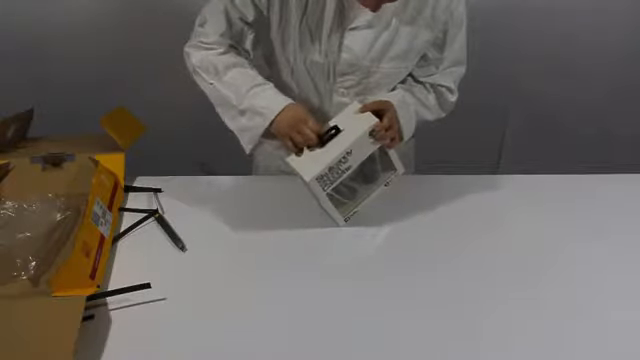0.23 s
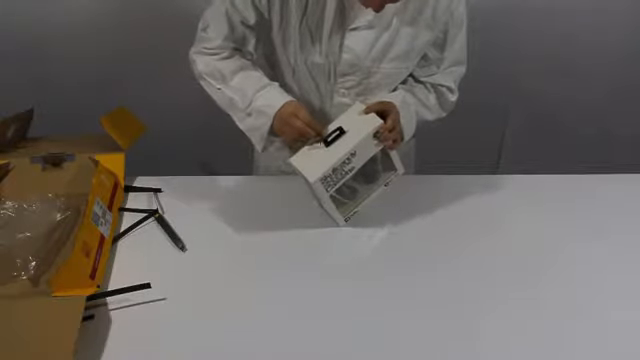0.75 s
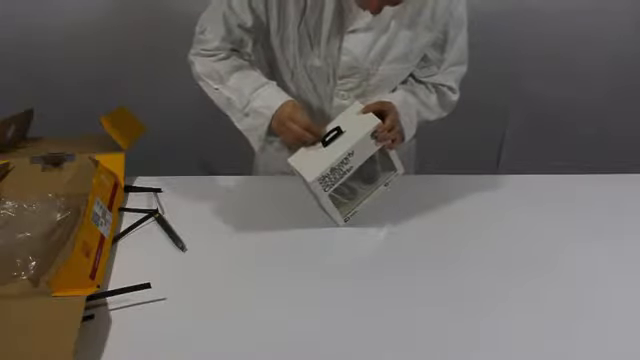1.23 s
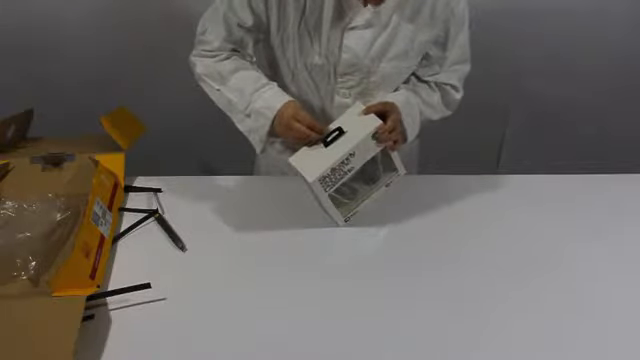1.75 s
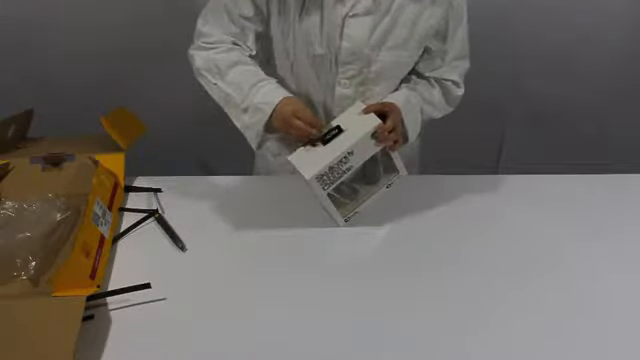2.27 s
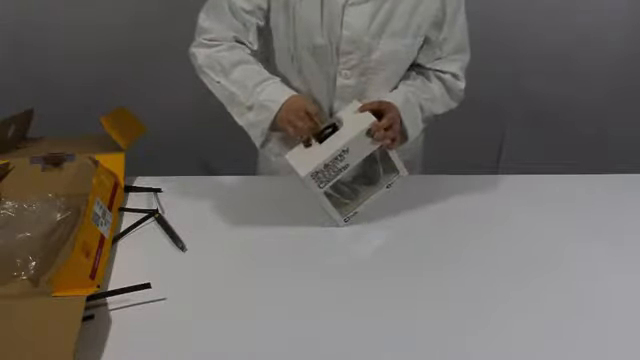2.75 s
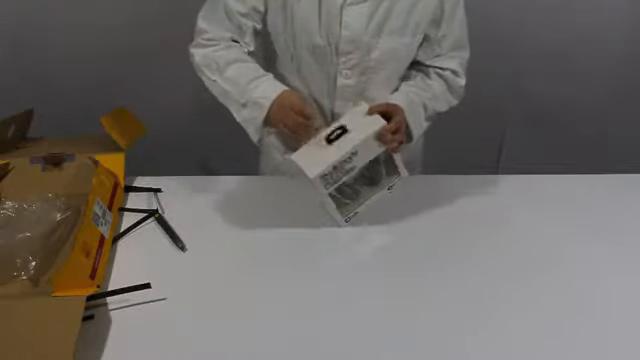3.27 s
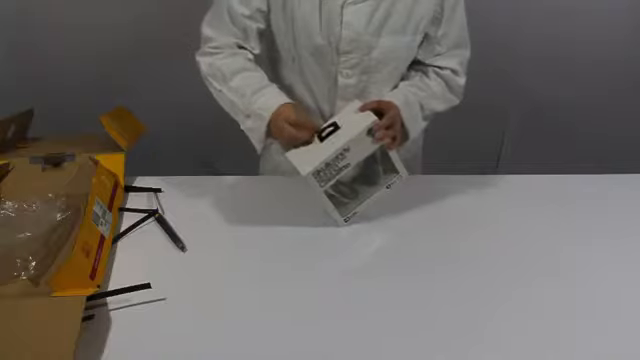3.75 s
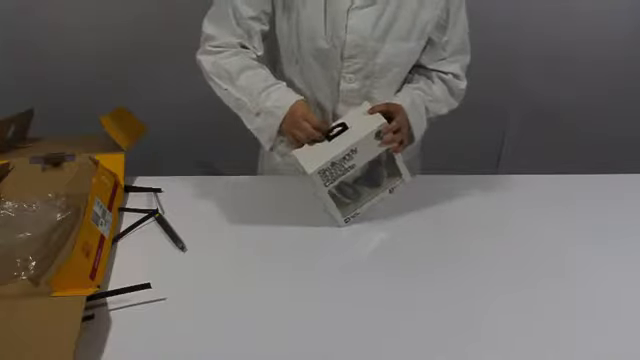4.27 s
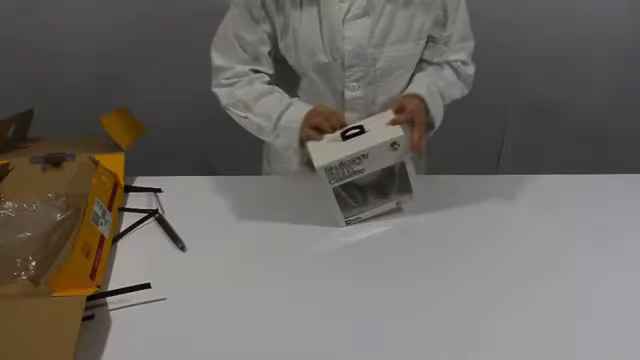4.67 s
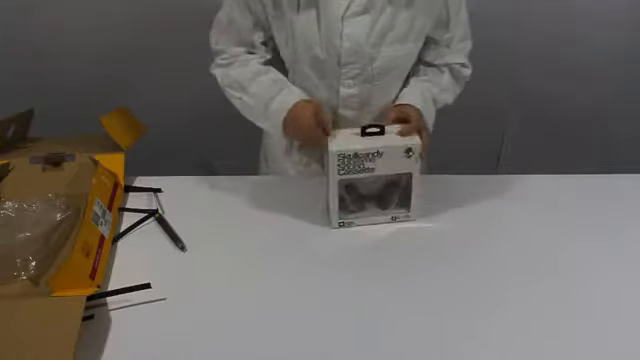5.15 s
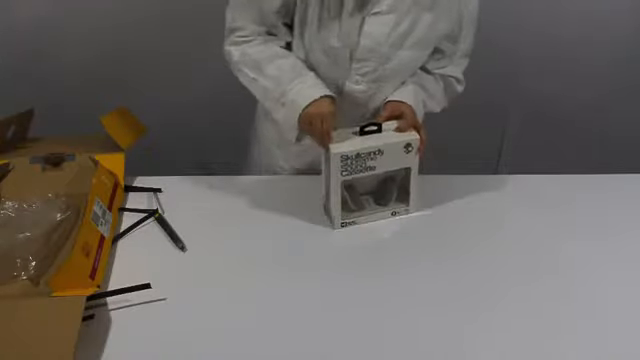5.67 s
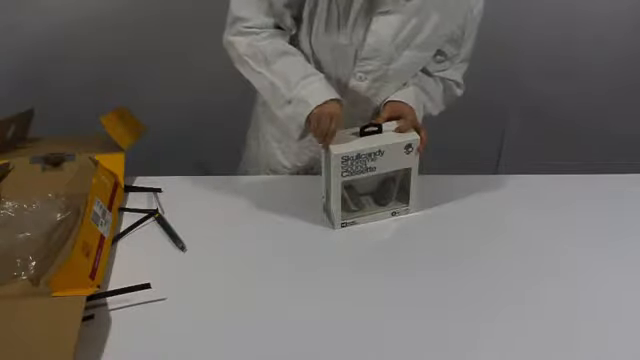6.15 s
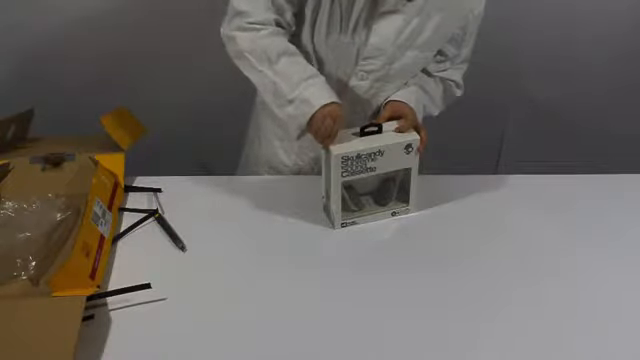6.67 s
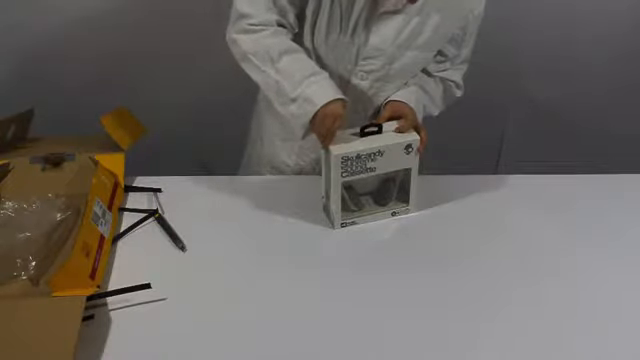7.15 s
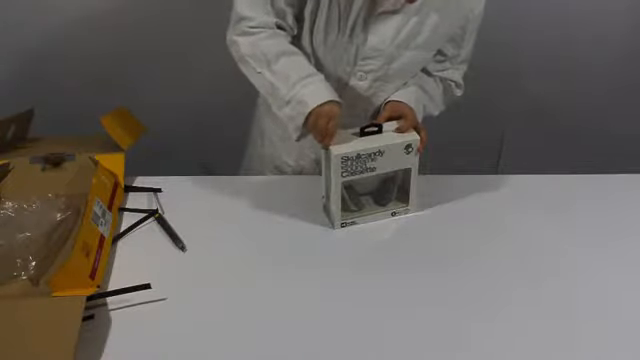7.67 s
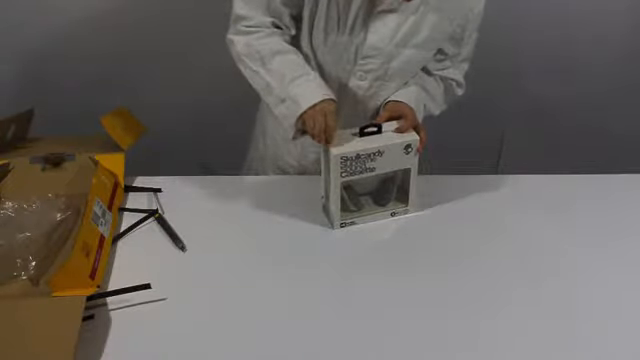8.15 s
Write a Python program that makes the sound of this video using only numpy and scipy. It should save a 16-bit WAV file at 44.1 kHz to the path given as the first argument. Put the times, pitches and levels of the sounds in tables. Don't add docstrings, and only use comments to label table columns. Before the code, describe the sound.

Fingernails pick at stiff plastic seals on a hollow cardboard box, sharp cracks and dull thumps spaced irregularly in a bare, echoing room.

```python
import sys
import numpy as np
from scipy import signal
from scipy.io import wavfile

SR = 44100
rng = np.random.default_rng(int(sys.argv[2]) if len(sys.argv) > 2 else 0)


def boost_factor(decibels):
    exponent = np.asarray(decibels, float) / 20
    return 10 ** exponent


def digitize_waveform(pressure):
    field = np.atleast_2d(pressure).T
    bounded = np.clip(field, -1, 1)
    quanta = np.round(bounded * 32767).astype(np.int16)
    wavfile.write(sys.argv[1], SR, quanta)


N = 371322


def rms_one(x):
    return x / np.sqrt(np.mean(x ** 2) + 1e-20)


def band(x, low_hz, high_hz):
    sos = signal.butter(2, [low_hz, min(high_hz, 0.45 * SR)], "band", fs=SR, output="sos")
    return signal.sosfilt(sos, x + 1e-18)


def high_pass(x, order, hz):
    return signal.sosfilt(signal.butter(order, hz, "high", fs=SR, output="sos"), x)


def at_hz(points, hz, column=1):
    points = np.array(points)
    return np.interp(np.log(hz), np.log(points[:, 0]), points[:, column])


def drift(knots_per_s):
    knots = rng.standard_normal(400)
    return np.interp(np.arange(N) / SR * knots_per_s, np.arange(400), knots)


def strikes(times_s, shapes):
    out = np.zeros(N + SR)
    for s, shape in zip(times_s, shapes):
        at = max(round(s * SR), 0)
        out[at:at + len(shape)] += shape
    return out[:N]


def rings(db, hz, t60_s, swell_s):
    t = np.arange(SR // 5) / SR
    decay_db = 60 * t / np.clip(t60_s, 0.005, 0.4)[:, None]
    envelope = boost_factor(db[:, None] - decay_db) * (1 - np.exp(-t / swell_s))
    return envelope * np.sin(2 * np.pi * hz[:, None] * t)


# frequency in Hz, level in dB per Hz.
AIR = [(15, -47), (25, -22), (87, 0.5), (149, -1.5), (212, -2.5), (476, -1), (659, -6.5), (775, -5.5),
       (988, -4), (1260, -2), (2000, -9.5), (3820, -12), (11900, -19), (16000, -20)]
AIR_DB = -56.5


def air(patchy_db=1.6):
    white = rng.standard_normal((2, N))
    edges_hz = 22 * 2 ** np.arange(0, 9.8, 1 / 3)
    out = np.zeros(N)
    for k, (low, high) in enumerate(zip(edges_hz, edges_hz[1:])):
        level_db = at_hz(AIR, np.sqrt(low * high)) + patchy_db * drift(3.7)
        out += boost_factor(level_db) * band(white[k % 2], low, high)
    return boost_factor(AIR_DB) * rms_one(out)


# time in seconds, pitch in Hz, level in dB.
MOTOR = [(0, 152, -71.5), (2.7, 152, -74), (3.0, 155, -68), (4.0, 148, -69), (4.2, 144, -58.5),
         (4.6, 142, -62), (4.75, 145, -73), (6.3, 149, -64), (6.6, 150, -62), (6.8, 158, -69.5),
         (7.1, 163, -63.5), (7.4, 163, -65.5), (7.7, 165, -56.5), (7.85, 162, -75), (8.15, 160, -73),
         (8.3, 157, -61), (8.42, 156, -61)]


def motor():
    s, hz_knots, db_knots = np.transpose(MOTOR)
    t = np.arange(N) / SR
    hz = np.interp(t, s, hz_knots)
    level_db = np.interp(t, s, db_knots) + 1.3 * drift(7)
    return np.sqrt(2) * boost_factor(level_db) * np.sin(2 * np.pi * np.cumsum(hz) / SR)


# delay in seconds, level in dB.
ECHOES = [(.0009, -3.5), (.0021, -9.5), (.0034, -17), (.0054, -17), (.0068, -11), (.0126, -14),
          (.0195, -24), (.023, -26)]
# frequency in Hz, t60 in seconds, level in dB.
ROOM = [(100, 0.8, -11.5), (300, 0.95, -9.5), (680, 0.78, -6), (1150, 1.08, -6.5), (2560, 1.14, -5.5),
        (4760, 1.06, -7.5), (7000, 0.76, -10.5), (10000, 0.65, -12), (14000, 0.42, -14)]


def room(x, echo_db, build_s=0.0028):
    t = np.arange(int(1.3 * SR)) / SR
    white = rng.standard_normal((2, len(t)))
    edges_hz = 60 * 2 ** np.arange(0, 8.6, 0.5)
    response = np.zeros(len(t))
    for k, (low, high) in enumerate(zip(edges_hz, edges_hz[1:])):
        hz = np.sqrt(low * high)
        level_db = at_hz(ROOM, hz, column=2) - 27.5 - 60 * t / at_hz(ROOM, hz)
        response += band(white[k % 2], low, high) * boost_factor(level_db)
    response *= 1 - np.exp(-(t / build_s) ** 2)
    response[0] = 1
    for s, level_db in ECHOES:
        response[round(s * SR)] += boost_factor(level_db + echo_db)
    return signal.fftconvolve(x, response)[:N]


# start in seconds, length in seconds, level in dB, lowest Hz, highest Hz.
RUBS = [(.01, 0.42, -62, 1200, 15000), (0.055, 0.37, -57, 200, 550), (2.19, 0.44, -60, 1500, 7000),
        (2.55, 0.09, -54, 1800, 7500), (2.712, 0.055, -58, 1800, 7000), (3.087, 0.088, -58, 4900, 15600),
        (3.665, 0.055, -49, 1000, 10000), (3.8, 0.66, -63, 990, 4430), (4.22, 0.24, -53, 5960, 15500),
        (4.733, 0.12, -55, 2500, 15500), (4.82, 0.27, -46.5, 900, 13000), (4.82, 0.27, -47.5, 248, 880),
        (4.909, 0.053, -50.5, 1000, 15500), (5.09, 0.73, -58.5, 900, 7000), (5.42, 0.42, -53.5, 150, 421),
        (5.525, 0.09, -57, 1500, 15000), (6.355, 0.04, -47.5, 1300, 10000), (6.9, 0.081, -65, 1500, 8000),
        (7.459, 0.04, -54, 3060, 9000), (7.855, 0.15, -68, 1500, 5980), (8.28, .08, -68, 2000, 15500)]
GRAINS_PER_CYCLE, MOST_GRAINS_PER_S = 3.3, 3000


def handling(uneven_db=4.1):
    sizes = boost_factor(uneven_db * np.minimum(rng.exponential(1, N), 5)) * rng.choice([-1, 1], N)
    chance = rng.random(N)
    out = np.zeros(N)
    for s, length_s, db, low_hz, high_hz in RUBS:
        span = slice(max(round(s * SR), 0), min(round((s + max(length_s, 0.02)) * SR), N))
        grains_per_s = np.clip(GRAINS_PER_CYCLE * low_hz, 200, MOST_GRAINS_PER_S)
        caught = chance[span] < grains_per_s / SR
        grains = band(sizes[span] * caught, low_hz, high_hz)
        stroke = np.sin(np.linspace(0, np.pi, len(grains)))
        out[span] += boost_factor(db) * rms_one(grains) * stroke
    return out


# time in seconds, peak in dB, pitch in Hz, t60 in seconds.
TABLE = [(1.017, -34, 114, 0.091), (2.042, -37, 107, 0.13), (3.199, -45, 100, .15), (4.86, -44, 110, .15),
         (4.95, -39, 100, 0.17), (5.02, -47, 65, 0.18), (5.56, -44, 149, 0.14), (6.066, -41, 111, .15),
         (6.631, -39.5, 123, 0.27), (7.221, -47, 111, .15)]


def table_booms():
    s, db, hz, t60_s = np.transpose(TABLE)
    return strikes(s, rings(db, hz, t60_s, swell_s=0.017))


DELAY_S = 0.001001
# time in seconds, peak in dB, struck panel in Hz, share of the
# low modes in dB, share of the upper modes in dB.
THUMPS = [(0.578, -34.1, 476.0, -13.3, -28.7), (1.018, -15.0, 444.0, -10.1, -13.6),
          (1.483, -18.1, 447.0, -7.8, -12.1), (2.039, -16.3, 491.0, -6.8, -4.6),
          (3.196, -18.4, 411.0, -16.3, -26.7), (4.391, -14.2, 490.0, -18.6, -4.4),
          (4.825, -31.7, 473.0, -15.4, -9.4), (4.866, -35.3, 520.0, -11.5, -6.5),
          (5.012, -28.0, 500.0, -20.8, 0.3), (5.4, -38.1, 425.0, -8.8, -13.2),
          (5.535, -36.6, 504.0, 0.3, -15.7), (5.618, -50.1, 450.0, 11.9, -4.0),
          (6.064, -25.5, 477.0, -5.8, -7.6), (6.28, -25.8, 470.0, -32.3, -15.1),
          (6.63, -11.4, 471.0, -16.0, -12.2), (7.22, -14.6, 422.0, -20.6, -17.6),
          (7.557, -30.9, 448.0, -21.0, -8.2)]
# time in seconds, peak in dB, struck
# panel in Hz.
MORE_THUMPS = [(0.223, -55, 435), (0.331, -43.5, 500), (0.618, -48, 490), (0.647, -55, 470), (0.951, -55, 463),
               (3.908, -42.5, 414), (4.279, -46, 460), (4.356, -42, 480), (5.756, -40, 430), (7.488, -41, 422),
               (7.727, -39, 444), (7.921, -42, 437), (7.959, -48, 440), (7.992, -47, 440), (8.326, -55, 401)]
MORE_LOW_DB, MORE_UPPER_DB = -14, -12
# frequency in Hz, level in dB, t60 in seconds.
BOX = [
    [(204, -4, 0.064), (243, 1, 0.062), (316.6, 4.5, 0.053)],
    [(608, 4, 0.045), (704, 3.5, 0.038)],
    [(882, 1.5, 0.026), (998, -2, 0.028)],
]


def box_thumps(panel_t60_s=0.036):
    taps = [(*tap, MORE_LOW_DB, MORE_UPPER_DB) for tap in MORE_THUMPS]
    s, db, hz, low_db, upper_db = np.transpose(THUMPS + taps)
    each = np.ones(len(s))
    box = rings(db - 0.5, hz, panel_t60_s * each, swell_s=0.00041)
    top_db = upper_db - 3.2
    for share_db, group in zip([low_db, upper_db, top_db], BOX):
        detune = 1 + 0.035 * rng.standard_normal((len(s), len(group)))
        for j, (mode_hz, mode_db, t60_s) in enumerate(group):
            level_db = db + share_db + mode_db - 2.0
            mode = rings(level_db, mode_hz * detune[:, j], t60_s * each, swell_s=0.00059)
            box -= (-1) ** j * mode
    return strikes(s + DELAY_S, box)


# time in seconds, peak in dB, brightness in dB per film resonance upward,
# fullness of the two middle resonances in dB.
CRACKS = [(0.2094, -33.1, 2.1, -7.9), (0.254, -38.8, 2.2, -3.4), (0.5752, -30.8, -2.8, 5.1),
          (0.8024, -51.7, -1.0, 15.6), (1.0175, 3.2, 2.7, 4.1), (1.2138, -21.4, 5.6, -0.8),
          (1.4812, 2.2, 3.6, 2.4), (2.0386, -10.3, 2.0, 7.0), (2.1934, -29.0, 0.8, 0.2),
          (3.0929, -34.0, 9.0, -0.1), (3.1912, -6.9, 4.1, -7.6), (3.195, -12.2, 1.4, -2.6),
          (3.3548, -30.3, 5.6, -4.5), (3.6704, -30.1, 0.6, 0.9), (3.6935, -31.5, 0.6, 7.5),
          (3.927, -47.7, 4.2, 13.3), (4.3885, -2.3, 6.6, -2.0), (4.7506, -28.9, 7.3, 0.7),
          (4.863, -23.5, 3.9, 1.0), (4.89, -22.6, 8.9, 4.0), (4.9276, -22.9, 3.7, 2.6),
          (5.01, -20.6, 7.4, 3.2), (6.0606, -25.9, 0.5, 5.2), (6.2771, -24.8, 4.0, 3.2),
          (6.3653, -32.5, -1.9, 9.7), (6.6278, -5.8, 4.3, 3.5), (7.215, -24.9, -1.3, 4.1),
          (7.474, -37.6, -2.8, 5.7), (7.5712, -34.3, 1.6, 8.0), (7.7258, -24.9, 2.5, -0.7)]
# centre in Hz, width in Hz.
FILM = [(1280, 640), (3050, 2400), (5800, 4200), (12700, 5900)]
FILM_SHARE_DB = -15


def cracks(burst_s=0.00035, ragged=0.23):
    s, db, bright_db, full_db = np.transpose(CRACKS)
    decay = np.exp(-np.arange(120) / SR / burst_s)
    force = ragged * rng.standard_normal((len(s), 120)) * decay
    force[:, 0] = -1.68
    out = np.zeros(N)
    for k, (hz, width_hz) in enumerate(FILM):
        low_hz, high_hz = hz - width_hz / 2, hz + width_hz / 2
        impulse_peak = np.abs(band(np.eye(1, 400)[0], low_hz, high_hz)).max()
        share_db = FILM_SHARE_DB + bright_db * (k - 1.5) + full_db * (k in (1, 2))
        hits = strikes(s + DELAY_S, force * boost_factor(db + share_db - 1.4)[:, None])
        out += band(hits, low_hz, high_hz) / impulse_peak * (-1) ** k
    return out


def scene():
    snap = high_pass(cracks(), 2, 140)
    thud = high_pass(box_thumps() + table_booms(), 3, 80)
    mono = room(snap + thud, echo_db=0.01) + room(handling(), echo_db=-9) + motor() + air()
    return np.array([mono, mono])


def low_pass(x):
    return signal.sosfilt(signal.butter(12, 17320, fs=SR, output="sos"), x)


CUTOFF_HZ = 16130


def record(dry):
    x = 0.94 * np.tanh(dry / 0.8)
    x = signal.sosfilt(signal.cheby2(14, 60, CUTOFF_HZ * 1.025, fs=SR, output="sos"), x)
    return low_pass(x)


dry = scene()
out = record(dry)
digitize_waveform(out)
```